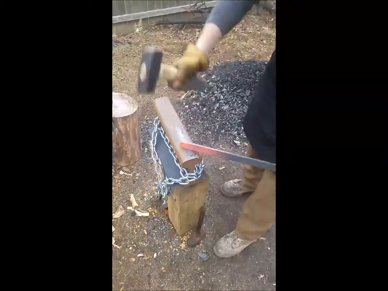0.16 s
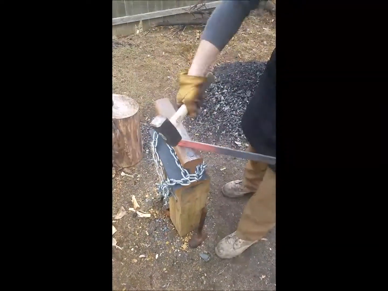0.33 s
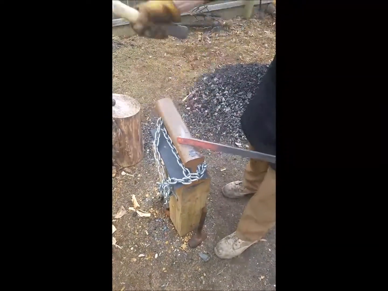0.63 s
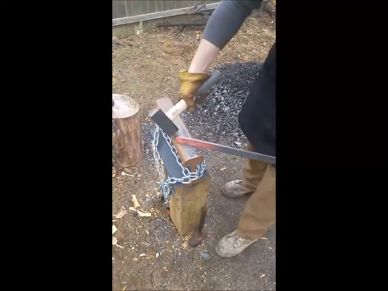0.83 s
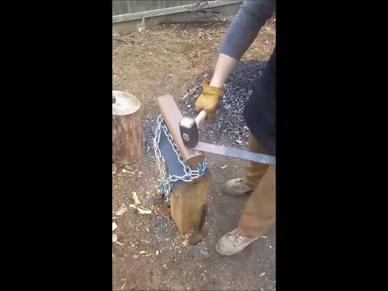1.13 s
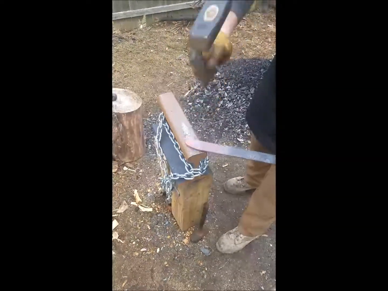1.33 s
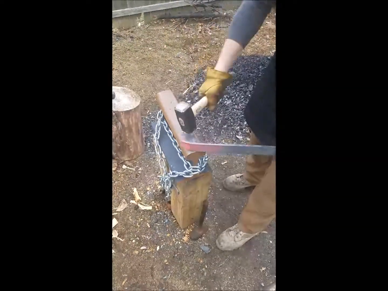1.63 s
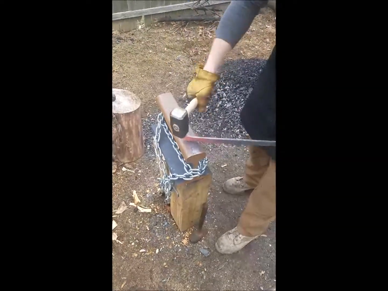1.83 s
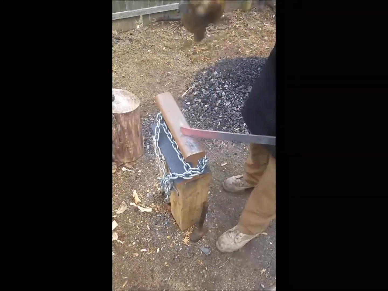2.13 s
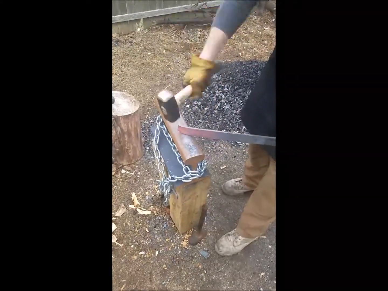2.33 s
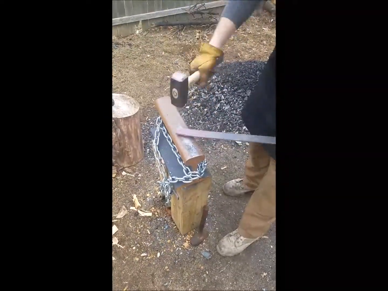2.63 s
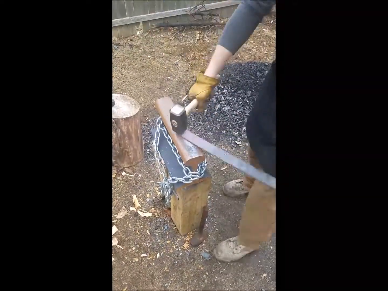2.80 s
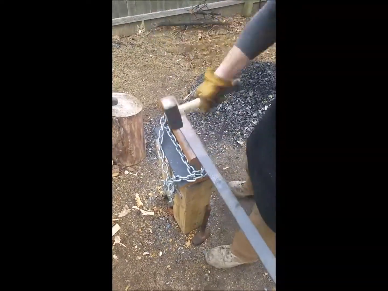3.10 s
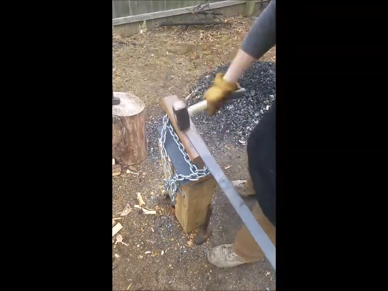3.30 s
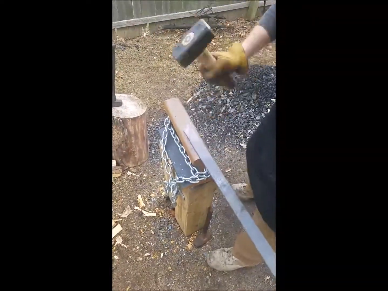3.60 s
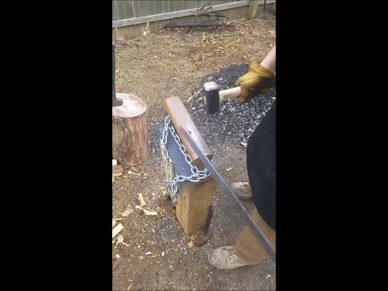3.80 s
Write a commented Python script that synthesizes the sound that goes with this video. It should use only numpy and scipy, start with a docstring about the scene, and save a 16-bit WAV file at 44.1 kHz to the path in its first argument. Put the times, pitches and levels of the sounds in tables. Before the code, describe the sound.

Hand hammer striking a hot steel bar on a small anvil, quick dull clanks over blower whine

```python
"""Outdoors, at a small anvil chained to a stump, a smith flattens a hot steel bar with a hand hammer.
Each blow is a short clank, deadened by the soft metal: decaying noise and a pulse excite resonances.
Between runs of blows the bar clinks as it is turned, by the same principle with other contact times.
Behind it the forge blower whines (sines) and hisses over the roar of the fire (shaped noise);
all of it dips after a blow and swells back in the pauses."""
import sys
import numpy as np
from scipy import signal
from scipy.fft import rfft, irfft
from scipy.io import wavfile

SR = 44100
rng = np.random.default_rng(int(sys.argv[2]) if len(sys.argv) > 2 else 0)


def to_wav(s):
    """Save 16-bit WAV."""
    ch = np.atleast_2d(s).T  # columns
    pcm = np.round(np.clip(ch, -1, 1) * 32767)  # PCM
    wavfile.write(sys.argv[1], SR, pcm.astype(np.int16))


N = 174195
T = np.arange(N) / SR

# Levels of the background over time: the roar and whine sink and return, and the whole starts low and swells
# in. Each row: time in seconds, gain of the whole in dB, further gain of the # roar in dB, further gain of the
# whine in dB.
FORGE_GAINS = [(0, -14, -13, -5), (.06, -4.5, -9.5, -6.5), (.2, -1.5, -9.5, -6.5), (.3, 1.5, -2, -2),
               (.82, -0.5, -1.5, 0), (.93, -1.5, -12, -6), (1.25, -0.5, -14, -6), (1.48, -1, -1.5, 0),
               (1.9, 0.5, -1.5, 0.5), (2.68, 1, -2, 0), (2.79, -2, 0.5, 3), (2.92, -1, -2, 2),
               (3.1, -1.5, 0, 3.5), (3.2, -5, -4, 1.5), (3.42, 1.5, -15, -6), (3.82, 0.5, -12.5, -4.5),
               (3.95, -2, -14.5, -3.5)]
# Spectrum of the fire's roar before its gains. Each row: frequency in Hz, density in dB per Hz.
ROAR_SPECTRUM = [(30, -89), (90, -93), (140, -88), (200, -81), (300, -73), (480, -73), (600, -76.5),
                 (880, -73), (1050, -69.5), (1400, -74), (2000, -99), (4000, -105)]
# Spectrum of the hissing air before its gain. Each row: frequency in Hz, density in dB per Hz.
HISS_SPECTRUM = [(30, -110), (600, -90), (900, -86), (1080, -77.5), (1500, -73), (2000, -79.5), (2500, -80),
                 (3200, -78), (5300, -74), (9000, -75.5), (11000, -81.5), (13000, -85.5), (16000, -88.5)]
# Likeness of the two ears in steady noise. Each row: frequency in Hz, correlation from -1 to 1.
EAR_CORRELATION = [(60, .2), (150, 0.81), (380, 0.84), (1000, 0.97), (2400, 0.46), (6000, -0.23),
                   (15000, -0.21)]
# Tones of the blower. Each row: multiple of the lowest tone, RMS level in dB before the forge gains,
# phase in radians by which the left leads.
BLOWER_TONES = [(1, -41.5, 0.12), (2, -65.5, 0.96), (6, -50, 0.3), (12, -63, 1.5)]
# Resonances of stump, anvil and hammer. Each row: frequency in Hz, bandwidth in Hz, mean height in dB.
BODY_MODES = [(280, 65, -4), (377, 100, 3.5), (487, 200, 7), (753, 129, 4), (1210, 190, 0.5),
              (2630, 200, -0.5), (3052, 140, 1.5), (3294, 67, -4.5), (5920, 400, -9), (7160, 110, 3.5),
              (10260, 190, 5.5), (10750, 240, 6.5), (11920, 440, 4), (14300, 570, 5)]
# Light clinks of the bar on the anvil. Each row: start in seconds, level in dB before the ring and grit
# offsets, level of the body in dB, decay time of the contact in seconds (0.0001 at least is used).
BAR_CLINKS = [(.054, -43.5, -57, 0.0018), (1.1414, -27, -46, 0.0024), (1.1481, -27.5, -52, 0.0048),
              (1.325, -28.5, -69, .0006), (1.7856, -27.5, -35, .003), (2.7326, -33, -50, .003),
              (2.7412, -28, -50, 0.0061), (2.8396, -31, -62, .002), (2.9073, -31.5, -51, 0.00076),
              (3.185, -55, -73, .002)]
# Second landings of the hammer. Each row: start in seconds, level in dB before the offsets of two bands.
HAMMER_REBOUNDS = [(0.2429, -20), (.379, -28), (0.7565, -30), (1.3, -22.5), (1.9994, -23.5), (3.249, -39),
                   (3.476, -43), (3.5886, -37), (3.701, -34)]
# Hammer blows. Each row: start in seconds, levels of thump, knock, clank, ring and crack in dB before
# BLOW_DB, lower and upper resonance of the bar in Hz, depth in dB toward which the background dips.
HAMMER_BLOWS = [(0.2313, -57, -37.5, -32.0, -23, -23.5, 1290, 3260, 1.2),
                (0.366, -50.5, -27, -25.5, -25, -25.5, 830, 3160, 3.5),
                (0.4943, -60, -29, -29, -25, -27, 740, 3160, 5.5),
                (0.6193, -52, -31, -30.5, -24.5, -28, 467, 3230, 11),
                (0.7427, -40.5, -32.5, -35.0, -29, -28.5, 420, 3240, 11.5),
                (0.8667, -62.0, -41.5, -38, -27, -28.5, 770, 3300, 11.5),
                (0.9886, -76, -49.0, -42, -29.5, -29.0, 1480, 3280, 9.5),
                (1.293, -70, -41, -30, -27.5, -25.5, 1520, 2880, 0.1),
                (1.41, -44.5, -33.0, -31.5, -23, -22, 437, 2870, 11.5),
                (1.5296, -49, -33.5, -34, -28.5, -26.0, 405, 2870, 12),
                (1.9879, -53.5, -26, -25.5, -24.5, -25, 830, 2980, 0.6),
                (2.1145, -61, -28.5, -29, -26.5, -28, 810, 2980, 7),
                (2.2336, -55, -31.0, -32, -27.5, -28.5, 800, 3170, 7.5),
                (2.3553, -54.5, -30.0, -27.5, -25.5, -25.5, 1100, 3090, 7.5),
                (2.4796, -54, -31.5, -29, -26, -26.0, 1110, 3300, 10.8),
                (2.607, -56, -33.5, -29, -28.5, -29, 1270, 3160, 10),
                (3.109, -41.0, -33.5, -33.5, -30.0, -24, 775, 1840, 14.5),
                (3.2342, -52, -43, -37, -37, -29.5, 1500, 3620, 18),
                (3.3517, -68.0, -50.5, -37, -32.0, -27, 1510, 2300, 18.5),
                (3.4663, -62, -50.5, -36.0, -31, -32, 1500, 2450, 18),
                (3.577, -77, -48.5, -37.0, -37, -28, 1440, 1600, 15.5),
                (3.6886, -74, -53, -39.5, -35.5, -26, 1240, 3810, 16.5)]
# Registers of a blow: thump, knock, clank, ring, crack. Each row: lower edge in Hz, upper edge in Hz.
BLOW_BANDS = [(30, 260), (250, 1050), (1000, 2300), (2200, 3900), (4400, 16000)]

# Forge
BLOWER_HZ, WAVER_HZ, FLUTTER_DB = 1052.4, 1.0, 0.6   # lowest tone; RMS wander of its pitch and of each level
SKIRT_HZ, SKIRT_DB = 40, -58   # turbulence around the lowest tone: corner of its spread, level
DIP_ATTACK_S, DIP_HOLD_S, RECOVER_DB_PER_S = 0.021, 0.12, 142

# Every contact
GROUND_S, GROUND_DB = 0.0038, -2.5   # bounce off the ground
YARD_HOLD_S, YARD_DECAY_S = 0.014, 0.0074   # scatter from nearby things
FENCE_DB, FENCE_DECAY_S = -28, 0.023   # faint far scatter
SWALLOW, SWALLOW_S = 0.49, 0.001   # share of the dip that falls on the contact's own tail, and how fast
SNAP, SNAP_PER_DIP_DB = 2.44, 0.24   # pressure pulse at first contact; harder where the dip is deeper
DIRECT_WIDTH, TAIL_WIDTH, WIDE_ABOVE_HZ = 0.84, 1, 3300   # left-right difference, mainly in the treble
LOW_WIDTH = 0.081   # left-right difference left in the bass
RUMBLE_WIDTH, RUMBLE_HZ = 0.97, 130   # the deepest thump differs between the ears
MODE_SPREAD_DB = 3   # each contact excites the resonances differently
TOP_HZ = 10850   # the crack dulls above this
RIGHT_LEAD_S, PAN_DB = .000024, 1.25   # arrival and loudness in favour of the right

# Clinks and blows
CLINK_RING_HZ, CLINK_RING_DB, CLINK_GRIT_DB = (9950, 13060), -4.5, -5.5
CONTACT_S, YARD_DB, BLOW_DB = 0.0026, -19.5, 1   # decay of a blow's first crack, yard scatter, common gain
BAR_LOW_WIDTH_HZ, BAR_LOW_DB = 235, -1.5   # the bar's resonances move with the place struck
BAR_HIGH_WIDTH_HZ, BAR_HIGH_DB = 274, -4
CUTOFF_HZ = 16000


def amp(db):
    """Level law: decibels to amplitude gain."""
    return 10 ** (np.asarray(db) / 20)


def at_hz(points, hz):
    """Spectra are interpolated linearly along a logarithmic frequency axis."""
    f, value = np.transpose(points)
    return np.interp(np.log(hz + 1), np.log(f), value)


def drift(rate):
    """Low-passed noise is a slow random fluctuation; rate is its corner in Hz, its spread is 1."""
    hz = np.fft.rfftfreq(N, 1 / SR)
    slow = irfft(rfft(rng.standard_normal(N)) / (1 + (hz / rate) ** 2), N)
    return slow / slow.std()


def filtered(x, hz, kind, order=2):
    """A causal Butterworth filter passes its band with maximal flatness."""
    edges = np.clip(hz, 10, .45 * SR)
    return signal.sosfilt(signal.butter(order, edges, kind, fs=SR, output="sos"), x)


def resonance(x, hz, width_hz):
    """A damped mode acts as a two-pole resonance, here with gain 1 at its peak."""
    r = np.exp(-np.pi * width_hz / SR)
    poles = [1, -2 * r * np.cos(2 * np.pi * hz / SR), r * r]
    return (1 - r * r) / 2 * signal.lfilter([1, 0, -1], poles, x)


def stereo_noise(spectrum):
    """Mid and side noises, weighted by the correlation, yield diffuse noise of a given spectrum."""
    hz = np.fft.rfftfreq(N, 1 / SR)
    alike = np.clip(at_hz(EAR_CORRELATION, hz), -1, 1)
    mid, side = rfft(rng.standard_normal((2, N)))
    both = np.sqrt(1 + alike) * mid + np.sqrt(1 - alike) * side * [[1], [-1]]
    return irfft(both * amp(at_hz(spectrum, hz)), N) * np.sqrt(SR) / 2


def dip_db():
    """Gain reduction with attack, hold and release: the background sinks at each blow and swells back."""
    down = np.zeros(N)
    for s, *_, depth in HAMMER_BLOWS:
        i = int(s * SR)
        recovered = RECOVER_DB_PER_S * np.maximum(T[i:] - s - DIP_HOLD_S, 0)
        down[i:] = np.maximum(depth - recovered, 0)
    r = np.exp(-1 / (DIP_ATTACK_S * SR))
    return -signal.lfilter([1 - r], [1, -r], down)


def whine():
    """Blower tones at whole multiples of one wavering rate, the lowest with a skirt of modulated noise."""
    turn = 2 * np.pi * np.cumsum(BLOWER_HZ + WAVER_HZ * drift(12.6)) / SR
    tones = np.zeros((2, N))
    for multiple, db, left_lead in BLOWER_TONES:
        phase = round(multiple) * turn + left_lead * np.array([[1], [0]])
        tones += amp(db + FLUTTER_DB * drift(25)) * np.sin(phase)
    skirt = drift(SKIRT_HZ) * np.sin(turn) + drift(SKIRT_HZ) * np.cos(turn)
    return np.sqrt(2) * tones + amp(SKIRT_DB) * skirt


def forge():
    """Independent sources superpose: air hisses, the fire roars and the blower whines."""
    s, *columns = np.transpose(FORGE_GAINS)
    whole_db, roar_db, whine_db = [np.interp(T, s, c) for c in columns]
    hiss = stereo_noise(HISS_SPECTRUM)
    roar = amp(roar_db + 0.81 * drift(24)) * stereo_noise(ROAR_SPECTRUM)
    return amp(whole_db + dip_db()) * (hiss + roar + amp(whine_db) * whine())


def strikes(dips_db, contact_s, yard_db):
    """Impact excitation: each contact is a decaying crack with echoes that sets the resonances ringing."""
    t = np.arange(SR // 8) / SR
    mid, side = np.moveaxis(rng.standard_normal((len(dips_db), 2, 1, len(t))), 1, 0)
    side = filtered(side, WIDE_ABOVE_HZ, "high", order=1) + LOW_WIDTH * side
    side = side * [[1], [-1]]

    direct = np.exp(-t / contact_s)
    ground = amp(GROUND_DB) * (t > GROUND_S) * np.exp(-abs(t - GROUND_S) / contact_s)
    yard = amp(yard_db) * np.exp(-np.maximum(t - YARD_HOLD_S, 0) / YARD_DECAY_S)
    yard = yard + amp(FENCE_DB) * np.exp(-t / FENCE_DECAY_S)
    late = np.hypot(ground, yard)
    x = mid * np.hypot(direct, late) + side * np.hypot(DIRECT_WIDTH * direct, TAIL_WIDTH * late)

    x = x * amp(-SWALLOW * np.reshape(dips_db, (-1, 1, 1)) * (1 - np.exp(-t / SWALLOW_S)))
    x[:, :, int(.0003 * SR)] += (SNAP + SNAP_PER_DIP_DB * dips_db)[:, None]
    rumble = filtered(rng.standard_normal(mid.shape) * direct, RUMBLE_HZ, "low")
    x = x + RUMBLE_WIDTH * rumble * [[1], [-1]]

    body = x
    for hz, width_hz, db in BODY_MODES:
        height_db = db + MODE_SPREAD_DB * rng.standard_normal((len(x), 1, 1))
        body = body + amp(height_db) * resonance(x, hz, width_hz)

    # a phase slope delays the left; the doubled length avoids wrapping round
    hz = np.fft.rfftfreq(2 * len(t), 1 / SR)
    lag = np.exp(-2j * np.pi * hz * RIGHT_LEAD_S * [[1], [0]])
    lagged = irfft(rfft(body, 2 * len(t)) * lag)[..., :len(t)]
    return filtered(lagged, TOP_HZ, "low", order=1)


def voiced(clanks, band, db):
    """Energy in one register sets its level, counted as the mean power over 30 ms."""
    if band[0] > 100:
        x = filtered(clanks, band, "band", order=3)
    else:  # a gentle lower edge keeps the lowest register tight
        x = filtered(filtered(clanks, band[0], "high", order=1), band[1], "low", order=3)
    power = (x ** 2).mean(1).sum(1) / (.03 * SR)
    return x * (amp(db) / np.sqrt(power))[:, None, None]


def add(out, s, sound):
    """Superposition: a stereo sound is summed in at its onset."""
    i = max(int(s * SR), 0)
    out[:, i:i + sound.shape[1]] += sound[:, :N - i]


def played(times, sounds):
    """Successive sounds superpose, each at its own onset."""
    out = np.zeros((2, N))
    for s, sound in zip(times, sounds):
        add(out, s, sound)
    return out


def clinks():
    """Light impacts of the bar on the anvil as it is turned: a high ring, some grit and a little body."""
    s, db, body_db, contact_s = np.transpose(BAR_CLINKS)
    contact_s = np.maximum(contact_s, 1e-4)[:, None, None]
    clanks = strikes(np.full(len(s), 10.), contact_s, yard_db=-19.5)
    ring = voiced(clanks, CLINK_RING_HZ, db + CLINK_RING_DB)
    grit = voiced(clanks, (3500, 15500), db + CLINK_GRIT_DB)
    body = voiced(clanks, (600, 3000), body_db)
    return played(s, ring + grit + body)


def rebounds():
    """A rebounding hammer lands again: a shorter contact time makes a short, bright sound."""
    s, db = np.transpose(HAMMER_REBOUNDS)
    clanks = strikes(np.full(len(s), 16.), contact_s=0.00074, yard_db=-19.5)
    bright = voiced(clanks, (9500, 12500), db - 8)
    broad = voiced(clanks, (1500, 15500), db - 2.5)
    return played(s, bright + broad)


def hammer():
    """Full impacts, coloured by two bar resonances that depend on how it lies and where it is struck."""
    s, *levels, low_hz, high_hz, dips = np.transpose(HAMMER_BLOWS)
    clanks = []
    for x, low, high in zip(strikes(dips, CONTACT_S, YARD_DB), low_hz, high_hz):
        bar_low = amp(BAR_LOW_DB) * resonance(x, low, BAR_LOW_WIDTH_HZ)
        bar_high = amp(BAR_HIGH_DB) * resonance(x, high, BAR_HIGH_WIDTH_HZ)
        clanks.append(x + bar_low + bar_high)
    clanks = np.array(clanks)
    blows = sum(voiced(clanks, band, db) for band, db in zip(BLOW_BANDS, levels))
    return amp(BLOW_DB) * played(s, blows)


def scene():
    """Intensity difference places forge and anvil a little to the right."""
    pan = amp(PAN_DB * np.array([[-.5], [.5]]))
    return (forge() + clinks() + rebounds() + hammer()) * pan


def record(dry):
    """Soft saturation rounds the peaks and a steep low-pass cuts the top."""
    top = 1.4
    rounded = top * np.tanh(dry / top)
    return signal.sosfilt(signal.ellip(10, .2, 80, CUTOFF_HZ, fs=SR, output="sos"), rounded)


dry = scene()
out = record(dry)
to_wav(out)
```